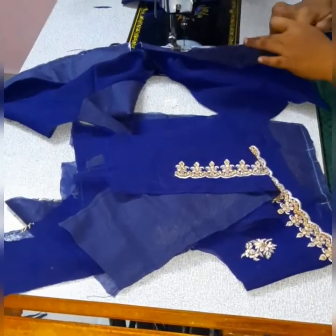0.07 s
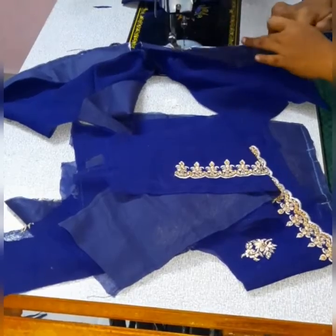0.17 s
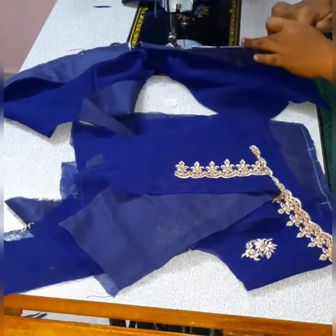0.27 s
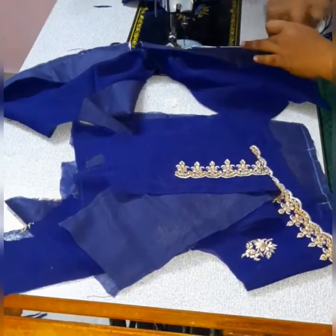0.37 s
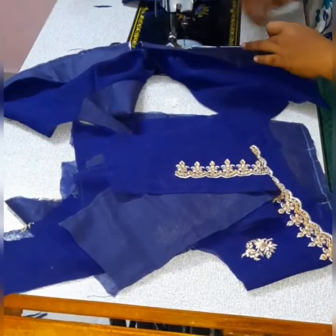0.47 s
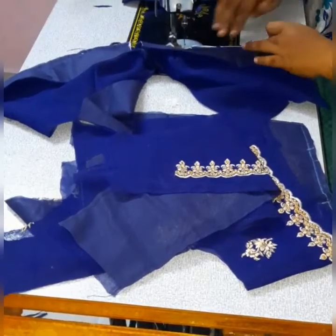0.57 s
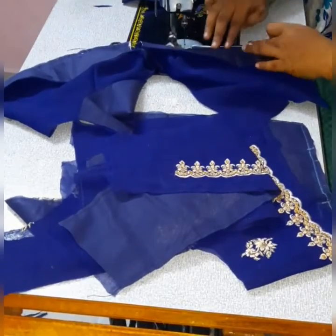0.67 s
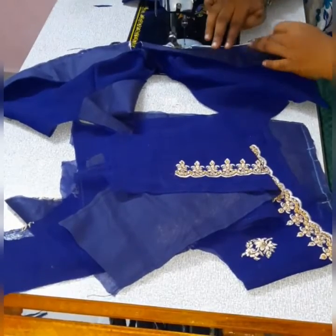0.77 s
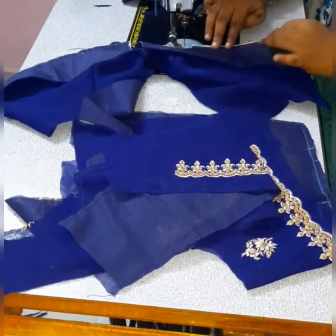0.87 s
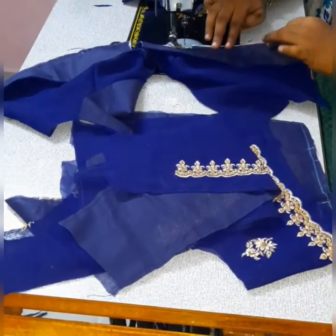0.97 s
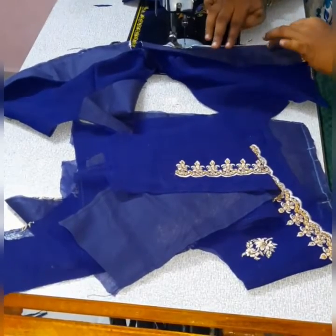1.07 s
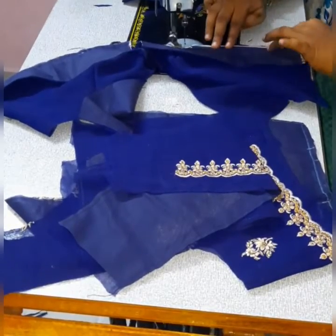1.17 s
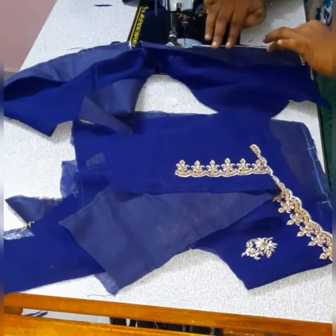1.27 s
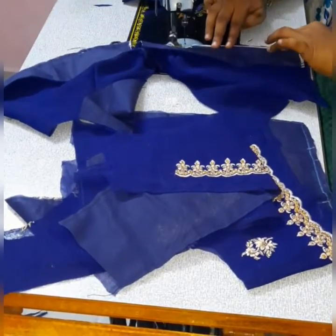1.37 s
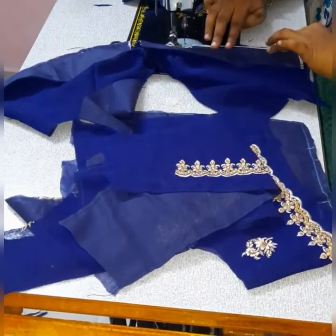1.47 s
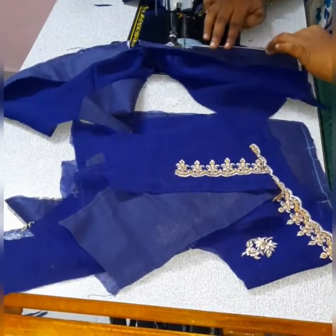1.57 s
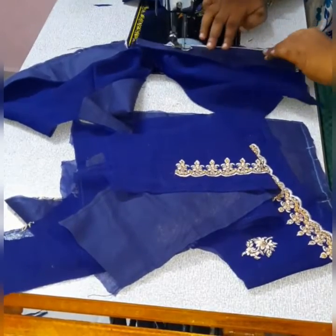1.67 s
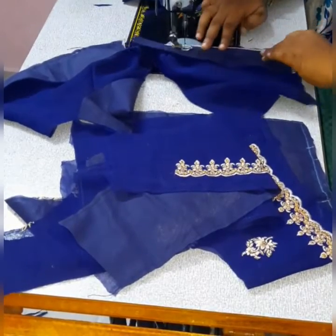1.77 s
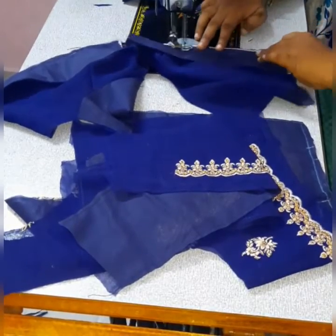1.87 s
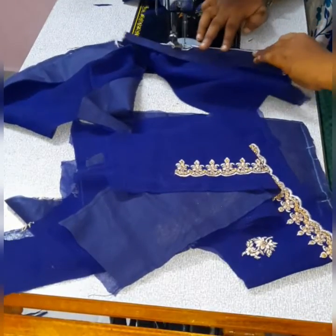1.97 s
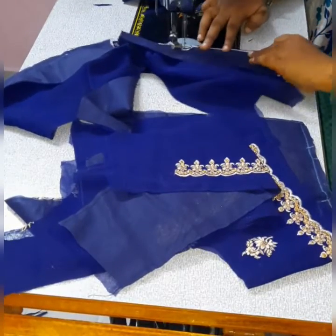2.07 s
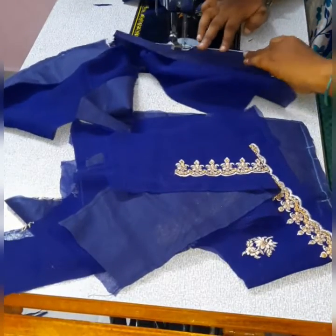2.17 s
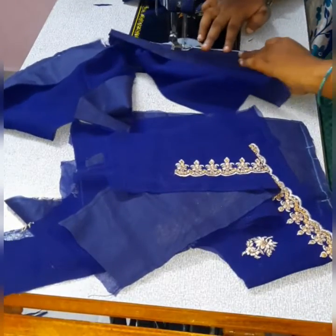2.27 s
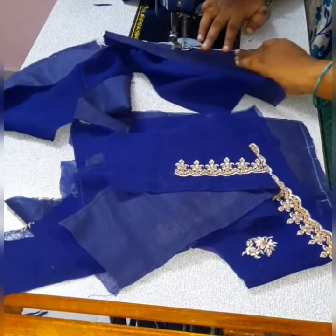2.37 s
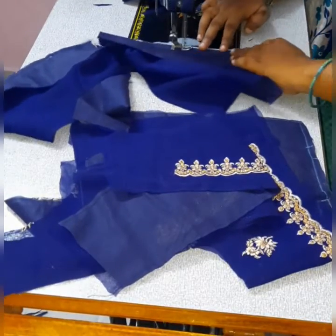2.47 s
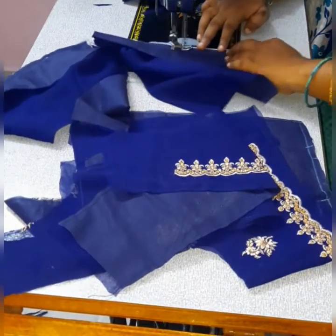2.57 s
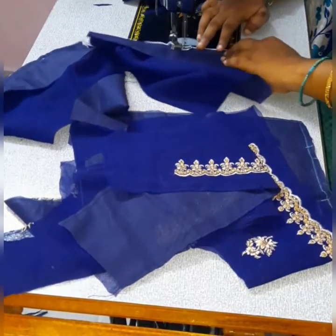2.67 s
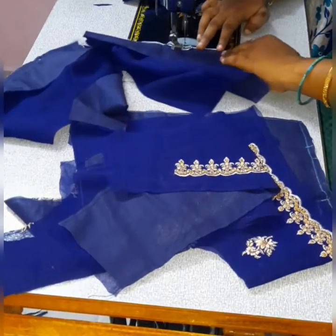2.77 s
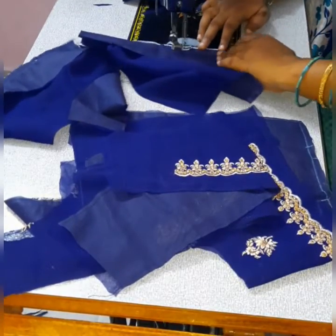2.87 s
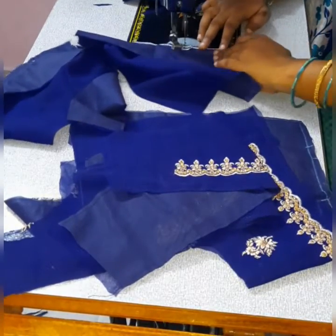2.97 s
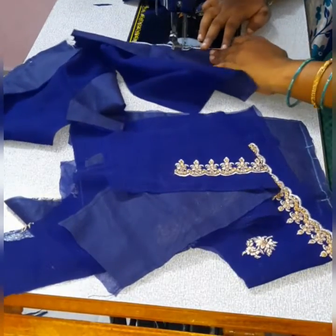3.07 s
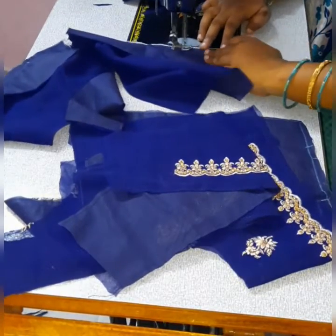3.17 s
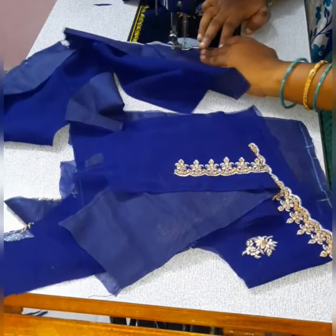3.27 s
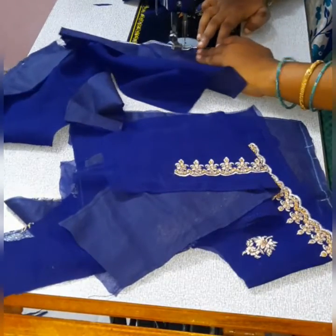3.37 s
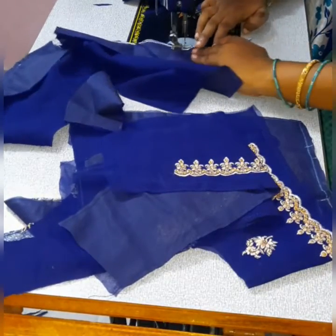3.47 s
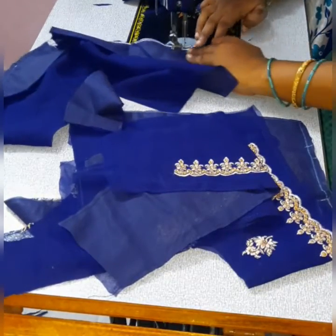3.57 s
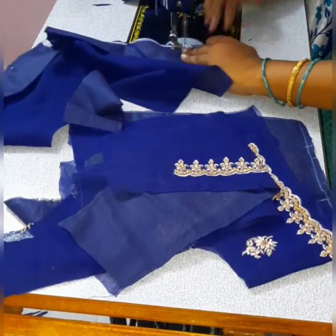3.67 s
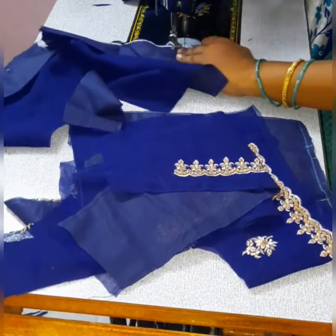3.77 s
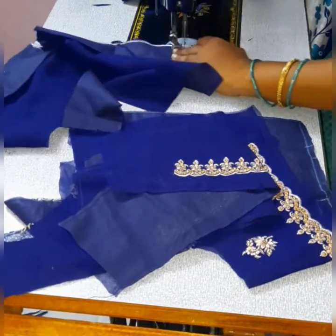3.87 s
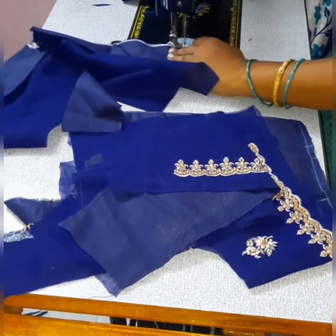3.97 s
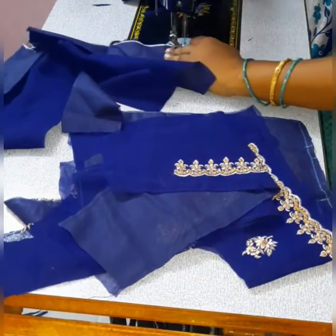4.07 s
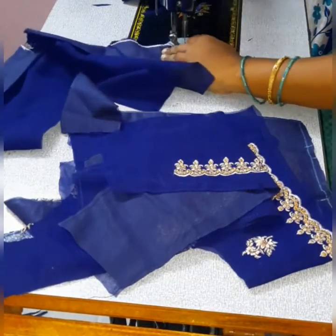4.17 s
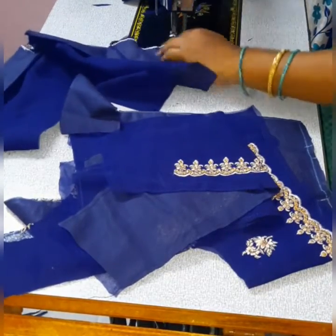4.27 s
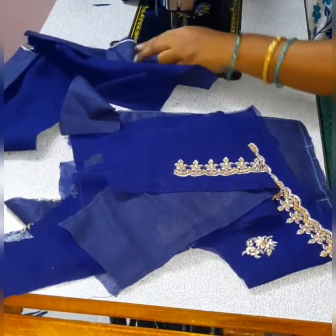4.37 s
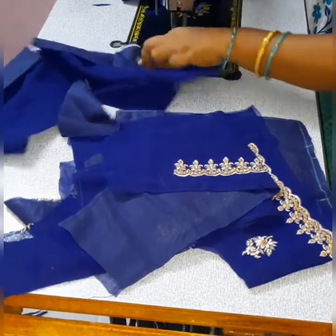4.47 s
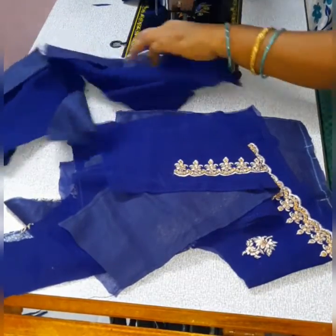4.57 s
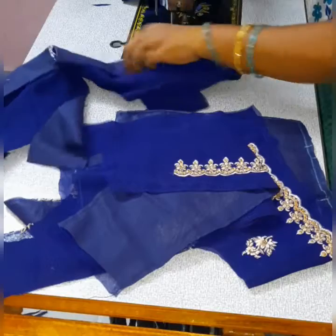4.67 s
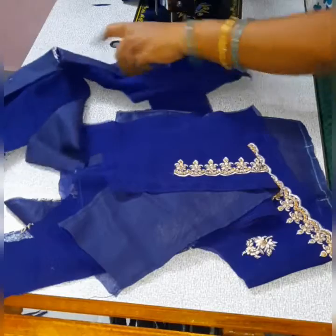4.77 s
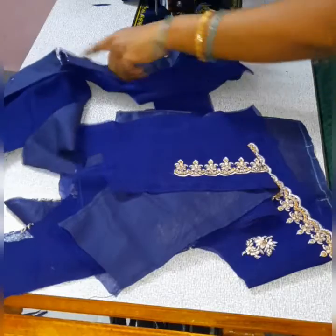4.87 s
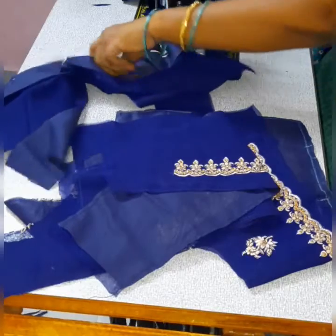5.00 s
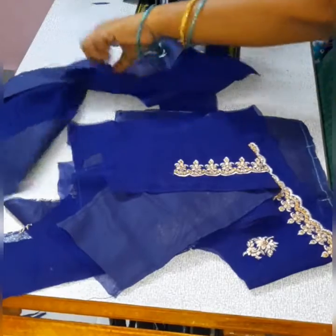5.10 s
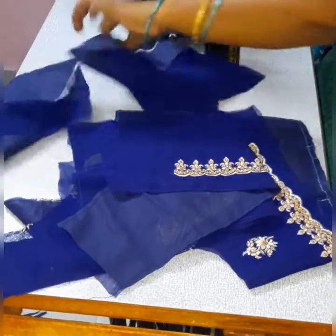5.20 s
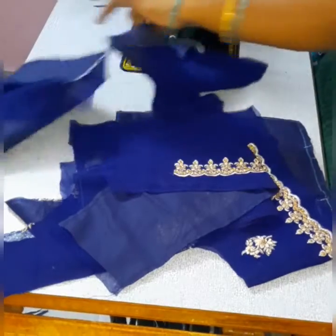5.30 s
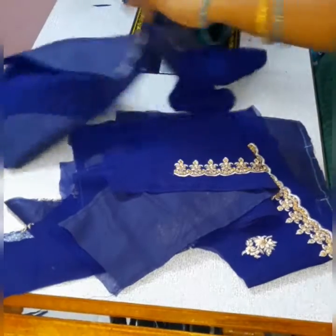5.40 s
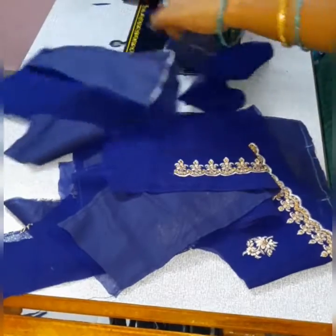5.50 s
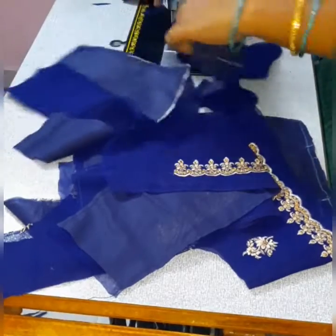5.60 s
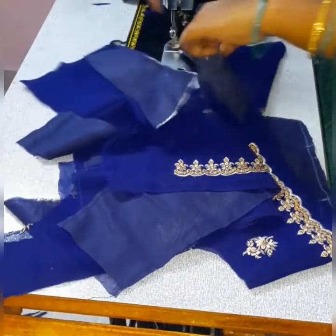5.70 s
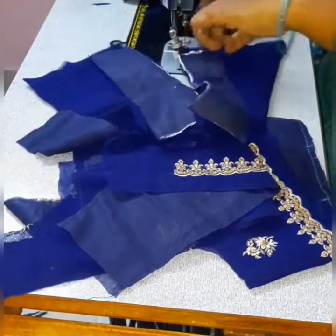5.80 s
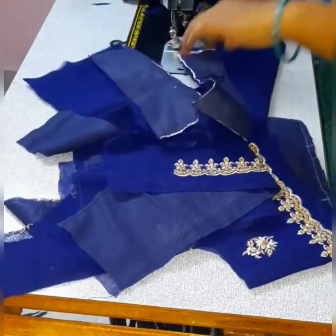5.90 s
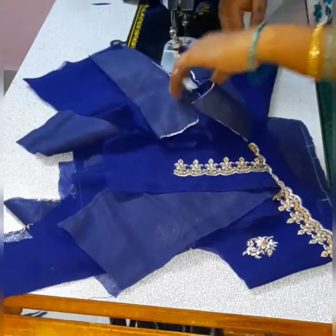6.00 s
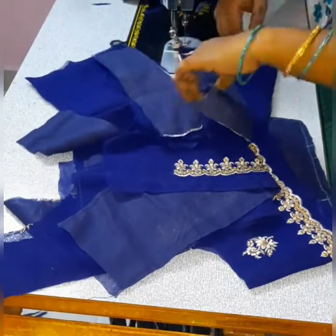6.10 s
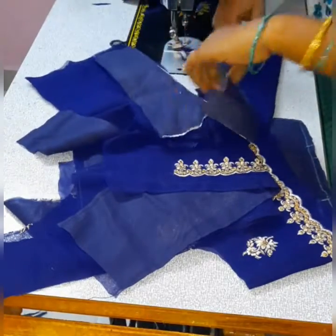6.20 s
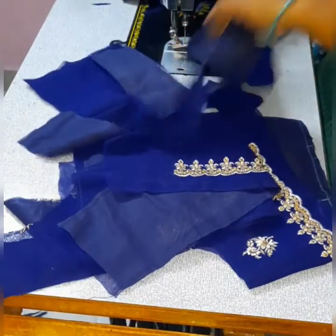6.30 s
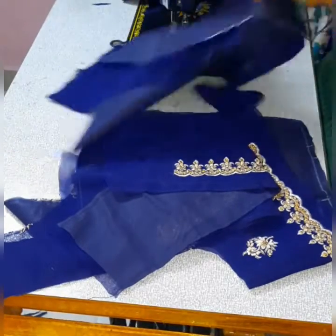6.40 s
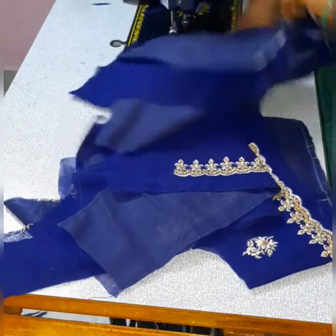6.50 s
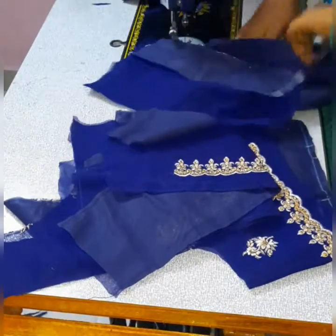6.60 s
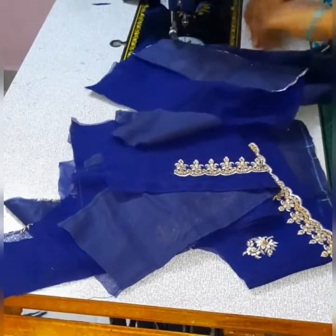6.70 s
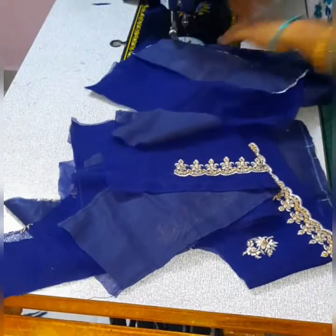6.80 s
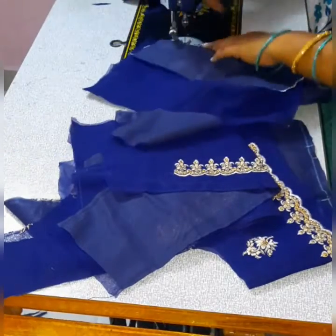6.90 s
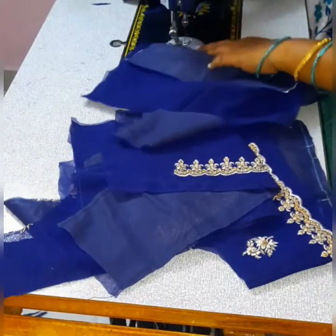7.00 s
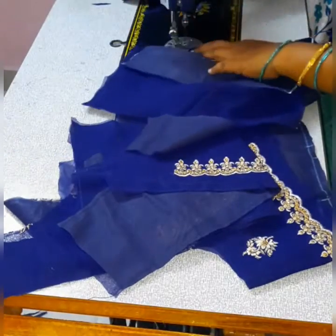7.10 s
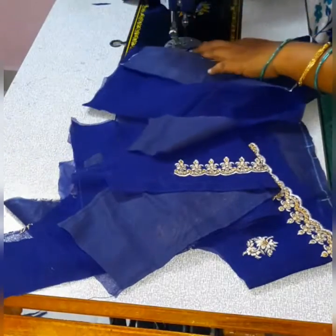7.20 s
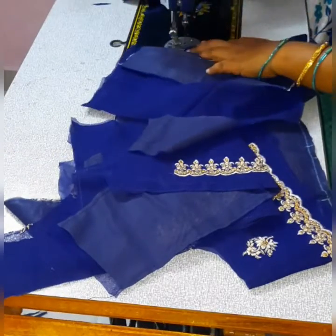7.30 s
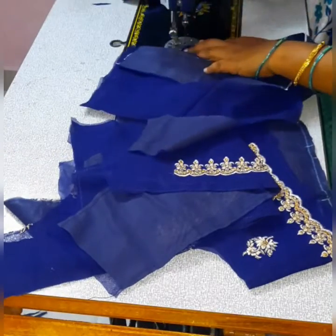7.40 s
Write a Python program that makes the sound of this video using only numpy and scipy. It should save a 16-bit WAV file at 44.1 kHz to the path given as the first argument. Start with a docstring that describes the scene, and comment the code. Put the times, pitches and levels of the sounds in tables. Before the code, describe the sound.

A small, bare-walled room with soft air, faint hiss and low hum, heard close to a cast-iron sewing machine on a wooden table. A light bump and bangle tick come at 0.6 seconds, then the presser foot clanks down in quick metal contacts around 0.8. Cloth slides faintly from 1.0. At 1.5 dry clicks start the seam: rapid clatter of iron, rattling steel and wooden thumping, about twelve to twenty stitches a second, dipping near 1.8 and 3.2, with heavier knocks near 1.6, 2.5 and 3.7 and short rising belt whirrs. From 4.0 it slows, falling to single clacks and stopping by 4.8. Bangles jingle faintly around 5.0; a lever knocks at 5.3 and snaps with a loud bright crack at 5.6, ringing briefly. Soft bumps, short cloth rasps and bangle ticks follow until 6.6, then near-quiet with thin distant chirps and a tiny click at 7.1.

```python
"""Cast-iron sewing machine, one seam

A cast-iron sewing machine on a wooden table sews one seam in a small, hard-walled room, speeding up and down.
Blows timed by the shaft angle excite table modes, iron modes and the chattering spectrum of the steel shuttle.
The presser foot clanks down before the seam and its lever snaps up after it: cracks, clacks and short rings.
Shaped noise makes the pulled cloth, ticking bangles and belt whirr, over soft air, hiss, hum and faint tones.
"""
import sys
import numpy as np
from scipy import signal
from scipy.fft import rfft, irfft
from scipy.io import wavfile
from scipy.ndimage import uniform_filter1d

SR = 44100
rng = np.random.default_rng(int(sys.argv[2]) if len(sys.argv) > 2 else 0)


def to_wav(s):
    """Save 16-bit WAV."""
    ch = np.atleast_2d(s).T  # columns
    pcm = np.round(np.clip(ch, -1, 1) * 32767)  # PCM
    wavfile.write(sys.argv[1], SR, pcm.astype(np.int16))


N = 328545
TIME = np.arange(N) / SR
RING = TIME[:SR // 2]  # time axis of every ring and echo tail


# Shaft speed, one stitch a turn: (time [s], speed [Hz])
SHAFT_SPEED = [(1.47, 7.7), (1.53, 12.4), (1.6, 16.15), (1.83, 12.2), (2.0, 17.63), (2.55, 19.74),
               (2.9, 15.64), (3.21, 13.3), (3.27, 16), (3.45, 18.36), (3.7, 21.15), (4.0, 14),
               (4.16, 12.56), (4.27, 13.36), (4.54, 8.95), (4.64, 4.7), (4.77, 2.3)]


def shaft():
    """Turns of the main shaft since the seam began: its speed summed over time."""
    sewing = (TIME > SHAFT_SPEED[0][0]) * (TIME < SHAFT_SPEED[-1][0])
    return np.cumsum(curve(SHAFT_SPEED) * sewing) / SR


# Blows within one stitch, relative levels:
# (shaft angle [turns], level into table [dB], level into iron [dB], level into steel [dB])
STITCH_BLOWS = [(.15, 1, -7, -0.5), (.28, 3, -6, -2.5), (0.431, -2.5, -15, -7.5), (.52, -7, -5, -11),
                (.66, 1.5, -4, -2.5), (0.771, 0.5, -9.5, -4), (.95, -17, 2.5, -5.5)]


def linkage(turns, scatter_db=2.5, play_s=.0006):
    """The linkage strikes at fixed shaft angles, scattered in level, and in time by slack in the joints."""
    steel_force = np.zeros(N)
    clacks = []
    for angle, table_db, iron_db, steel_db in STITCH_BLOWS:
        times = TIME[np.searchsorted(turns, np.arange(angle, turns[-1], 1))]
        chance = rng.standard_normal((len(times), 4)).T
        times = times + play_s * chance[0]
        clacks.append([times, table_db + scatter_db * chance[1], iron_db + scatter_db * chance[2]])
        steel_force += taps(times, undb(steel_db + scatter_db * chance[3] / 2))
    times, thump_db, clack_db = np.hstack(clacks)
    return times, thump_db, clack_db, steel_force


# Modes of the wooden table: (frequency [Hz], relative level [dB])
TABLE_MODES = [(50, -19), (85, -11), (104, -10), (136, 2.5), (158, -10.5), (200, -18.5), (278, 4.5),
               (331, 8.5), (362, 3.5), (400, 0.5), (478, 0.5)]
# Modes of the iron head: (frequency [Hz], relative level [dB])
IRON_MODES = [(530, 4.5), (597, 10), (695, -2.5), (758, 0), (900, -1), (1037, 5.5), (1222, 3), (1390, 2),
              (1570, 3.5), (1900, 2), (2224, -11)]
# Dense ring of the small steel parts, as a spectrum: (frequency [Hz], relative level [dB])
STEEL_SPECTRUM = [(600, -5.5), (1500, -16.5), (2500, -1.5), (3500, -5.5), (5000, -3.5), (7000, -4.5),
                  (8500, -3.5), (10000, -9), (11000, -10), (11900, -6.5), (15500, -10.5)]
# Clear modes of the shuttle and needle plate: (frequency [Hz], relative level [dB])
SHUTTLE_MODES = [(2115, -5), (2224, -2), (3690, -3), (4455, -3.5)]
# Direct sound of table, iron and steel against their echoes: one level [dB] each
PARTS_DIRECT = [-0.5, -12, -18]
SOFT_BELOW_HZ = 12


def machine(table_t60_s=0.15, iron_t60_s=0.023, shuttle_t60_s=0.069, spot_db=3,
            rub_db=-8, slide_db=-6, crack_db=-4, shuttle_db=-10):
    """Blows ring table, iron and steel; slow iron and steel meet softly, so the rubbing stands out."""
    turns = shaft()
    times, thump_db, clack_db, steel_force = linkage(turns)
    # the shuttle swings out and back, so rubbing swells twice a turn
    swing = (np.gradient(turns) > 0) * np.abs(np.cos(2 * np.pi * (turns - STITCH_BLOWS[0][0])))
    hardness = np.minimum(curve(SHAFT_SPEED) / SOFT_BELOW_HZ, 1) ** 2

    table = strike(times, thump_db, TABLE_MODES, table_t60_s, spot_db=3.0)

    # loose parts buzz for a moment after each blow
    crack = through(taps(times, undb(clack_db)), fade(0.032)) * grit(5.1)
    chatter = through(steel_force, fade(0.032)) * grit(5.1)
    crack = signal.sosfilt(signal.butter(2, [1500, 4500], "band", fs=SR, output="sos"), crack)

    rub = through(grit(4), ring(IRON_MODES, iron_t60_s))
    iron_blows = steady(strike(times, clack_db, IRON_MODES, iron_t60_s, spot_db))
    iron = hardness * iron_blows + undb(rub_db) * swing * rub

    steel_body = colour(STEEL_SPECTRUM)
    steel_body = steel_body + undb(shuttle_db) * ring(SHUTTLE_MODES, shuttle_t60_s)[:len(steel_body)]
    rattle = hardness * steady(chatter) + undb(slide_db) * swing * grit(2.7)
    steel = through(rattle, steel_body) + undb(crack_db) * hardness * steady(crack)

    return sum(steady(room(part, PARTS_DIRECT[k])) * undb(effort(axis=k))
               for k, part in enumerate([table, iron, steel]))


REFERENCE_SPEED_HZ = 20
# Growth with speed, one row each for table, iron, steel:
# (level at reference speed [dB], slope [dB per doubling of speed])
LOUDNESS_BY_SPEED = [(-24, 12), (-24, 15.5), (-29.5, 12)]
# Thick layers under the needle load the machine:
# (time [s], half-length [s], table change [dB], iron change [dB], steel change [dB])
THICK_LAYERS = [(1.669, 0.14, 6, 8, -3.5), (3.767, 0.1, 7.5, -1.5, 0)]


def effort(axis):
    """Level in dB of table, iron or steel: it follows the speed and changes over thick layers."""
    reference_db, db_per_doubling = LOUDNESS_BY_SPEED[axis]
    load_db = sum(part_db[axis] * np.exp(-((TIME - s) / half_s) ** 2) for s, half_s, *part_db in THICK_LAYERS)
    return reference_db + db_per_doubling * doublings() + load_db


def doublings():
    """Shaft speed in doublings above the reference speed, negative below it."""
    return np.log2(np.maximum(curve(SHAFT_SPEED), 1) / REFERENCE_SPEED_HZ)


# Needle punching thick layers, levels before the lifts in knocks():
# (time [s], level into table [dB], level into iron [dB], strongest ring of the head [Hz])
NEEDLE_KNOCKS = [(1.519, -22, -21.5, 1440), (1.578, -16, -15, 1378), (1.6, -6.5, -15.5, 1037),
                 (1.911, -38, -25.5, 1376), (1.987, -14.5, -17.5, 700), (2.542, -7, -9, 1495),
                 (3.231, -24.5, -17, 1199), (3.675, -11.5, -8, 760), (3.698, -9, -10.5, 589),
                 (3.727, -19.5, -5, 1570), (3.747, -8.5, -10, 1564), (3.795, -4, -15, 598),
                 (4.222, -13.5, -19, 1110), (4.325, -44, -18, 1170)]
KNOCK_DIRECT_DB = -7  # the needle is in plain view
FOCUS_OCTAVES, KNOCK_TOP_HZ = 0.19, 4500  # span of the modes one knock brings out; treble limit


def knocks(table_db=20, iron_db=19, focus_db=10, iron_t60_s=0.023):
    """Heavy blows shake table and head together; each brings out its own modes of the head."""
    times, push_db, _, _ = np.transpose(NEEDLE_KNOCKS)
    sound = through(taps(times, undb(push_db + table_db)), ring(TABLE_MODES, 0.089))
    for s, _, blow_db, focus_hz in NEEDLE_KNOCKS:
        modes = []
        for hz, db in IRON_MODES + SHUTTLE_MODES:
            nearness = np.exp(-(np.log2(hz / focus_hz) / FOCUS_OCTAVES) ** 2)
            modes.append((hz, db + focus_db * nearness))
        sound += through(taps([s], [undb(blow_db + iron_db)]), ring(modes, iron_t60_s))
    # the cloth cushions the blow
    return signal.sosfilt(signal.butter(1, KNOCK_TOP_HZ, fs=SR, output="sos"), sound)


# Dry steel clicks, two as the seam starts and one after it:
# (time [s], level [dB], chatter decay to -60 dB [s])
STEEL_CLICKS = [(1.472, -12.5, 0.04), (1.489, -13, .07), (7.131, -30, 0.0036)]


def steel_clicks():
    """Short uneven bursts coloured by the small steel parts."""
    return through(blows(STEEL_CLICKS), colour(STEEL_SPECTRUM))


# Whirr at each push of the treadle: (start [s], length [s], starting pitch [Hz], level [dB])
TREADLE_PUSHES = [(1.868, 0.12, 668.6, -27.5), (2.13, 0.099, 775, -23), (2.37, 0.14, 777, -29),
                  (3.25, 0.12, 728, -27.5), (3.45, 0.15, 784.5, -27.5)]
WHIRR_RISE_HZ_PER_S = 750


def belt(width_hz=65, throb=0.41, fade_s=0.032):
    """A rough belt whirr that rises in pitch through each push and throbs once a turn."""
    whirr, blur = np.zeros(N), wander(width_hz)
    for start, length, hz, db in TREADLE_PUSHES:
        age = TIME - start
        gate = np.clip(np.minimum(age, length + fade_s - age) / fade_s, 0, 1)
        turning = np.exp(2j * np.pi * (hz + WHIRR_RISE_HZ_PER_S * age / 2) * age)
        whirr += undb(db) * gate * np.real(blur * turning)
    return np.sqrt(2) * whirr * (1 + throb * np.cos(2 * np.pi * shaft()))


# Table droning on as the machine coasts to rest: (start [s], end [s], level [dB])
TABLE_DRONES = [(4.49, 4.59, -37.5), (4.63, 4.72, -46.5), (4.76, 4.9, -58.5)]


def table_drone():
    """A blurred low tone: narrow noise around one pitch."""
    return thin_tone(TABLE_DRONES, 335, 27, clean=0, fade_s=.025)


# Bright crack of steel on steel, as a spectrum: (frequency [Hz], relative level [dB])
CRACK_SPECTRUM = [(300, -6), (1000, -9), (3900, -1), (4550, 3), (5500, -6.5), (8600, -2.5), (10200, -12),
                  (12000, -5.5)]


def metal(hits, modes, body, t60_s, ring_db, clack_db):
    """Steel meeting steel: a bright crack, a broad clack damped by the contact, then a short free ring."""
    clack = through(blows([(s, db, chatter_s) for s, db, _, chatter_s in hits]), colour(body))
    free = sum(through(taps([s], [undb(db)]), ring(modes, t60_s, spot_db=2)) for s, db, _, _ in hits)
    crack = through(blows([(s, db, chatter_s) for s, _, db, chatter_s in hits]), colour(CRACK_SPECTRUM))
    return undb(ring_db) * free + undb(clack_db) * clack + crack


# Presser foot coming down, clank before its lifts:
# (time [s], clank level [dB], crack level [dB], chatter decay to -60 dB [s])
FOOT_BLOWS = [(.770, -40, -32, 0.039), (.799, -41, -44, 0.011), (.822, -42, -42, 0.013),
              (.846, -50, -19, 0.04)]
# Modes of the foot: (frequency [Hz], relative level [dB])
FOOT_MODES = [(156, 1.5), (307, 4), (1028, 7), (1500, -1), (1588, 5)]
# Its dull clack on the cloth and plate, as a spectrum: (frequency [Hz], relative level [dB])
FOOT_CLACK_SPECTRUM = [(90, -20), (160, -20), (310, 0.5), (750, -15), (1030, -15), (1550, -2.5),
                       (1840, -20), (2350, -7), (3100, -27), (4300, -20), (5400, -37)]


def presser_foot():
    """The foot meets cloth and plate in a few quick metal contacts."""
    return metal(FOOT_BLOWS, FOOT_MODES, FOOT_CLACK_SPECTRUM, t60_s=.06, ring_db=29, clack_db=31.0)


# The foot's lever creaks, knocks and snaps up, clank before its lifts:
# (time [s], clank level [dB], crack level [dB], chatter decay to -60 dB [s])
LEVER_BLOWS = [(5.285, -55.5, -31, .01), (5.329, -44, -16, 0.035), (5.613, -29.5, -1, 0.039),
               (5.640, -37, -12.5, 0.035)]
# Modes of the lever: (frequency [Hz], relative level [dB])
LEVER_MODES = [(350, 2), (1034, 2), (1270, 0), (1870, 1), (3359, -4)]
# Its loose clack in the head, as a spectrum: (frequency [Hz], relative level [dB])
LEVER_CLACK_SPECTRUM = [(100, -22), (220, -15), (345, 1), (500, -11.5), (1100, -1), (1650, -10),
                        (1880, -6.5), (2300, -12.5), (4600, -9), (15500, -20)]


def foot_lever():
    """The lever's metal contacts, with its spring singing after them."""
    return metal(LEVER_BLOWS, LEVER_MODES, LEVER_CLACK_SPECTRUM, t60_s=.07, ring_db=25.0, clack_db=29.5) + spring()


def spring(hz=11520, t60_s=.35, below_crack_db=-17.5):
    """The lever's spring sings thinly after each blow: one high decaying mode."""
    times, _, crack_db, _ = np.transpose(LEVER_BLOWS)
    return through(taps(times, undb(crack_db + below_crack_db)), ring([(hz, 0)], t60_s))


# Hands and treadle bumping the table, before the lift in bumps(): (time [s], level [dB])
TABLE_BUMPS = [(0.576, -47.5), (5.179, -43.5), (5.334, -38.5), (5.47, -42), (5.86, -44.5)]


def bumps(bump_db=37):
    """Soft bumps, low-passed pushes, move the table alone."""
    times, db = np.transpose(TABLE_BUMPS)
    soft = signal.sosfilt(signal.butter(2, 150, fs=SR, output="sos"), taps(times, undb(db)))
    return undb(bump_db) * through(soft, ring(TABLE_MODES, 0.097))


# Pulls of cloth over the table: (start [s], length [s], level [dB])
CLOTH_SLIDES = [(1.047, 0.37, -70.5), (5.163, 0.31, -65), (5.433, 0.13, -62.5), (5.78, 0.12, -59.5),
                (5.896, 0.058, -53.5), (6.396, 0.042, -48.5), (6.519, 1, -79)]
# Rasp of the cloth, as a spectrum: (frequency [Hz], relative level [dB])
CLOTH_SPECTRUM = [(410, -34), (700, -4), (1410, -3.5), (2220, -5.5), (4600, -7.5), (8300, -12.5),
                  (15500, -21)]
# Light ticks of bangles and steel: (time [s], tick level [dB], jingle level [dB])
BANGLE_TICKS = [(0.569, -29.5, -42), (0.847, -34, -40), (4.92, -36, -34), (5.026, -28, -25.5),
                (5.913, -19.5, -33), (5.979, -24, -32), (6.036, -26, -29), (6.527, -30, -21.5),
                (6.595, -34, -46), (6.973, -35, -43)]
# Ring of the bangles, as a spectrum: (frequency [Hz], relative level [dB])
BANGLE_SPECTRUM = [(1500, -9), (4000, -10), (7000, 0), (10200, -1), (11800, 8), (14500, -6)]


def handling(jingle_s=0.15, rustle_db=-81, rough_db=5, catch_db=3, catch_hz=18):
    """Threads rasp over the table at each pull, catching and slipping; bangles tick and jingle briefly."""
    motion = sum(undb(db) * stroke(start, length) for start, length, db in CLOTH_SLIDES) + undb(rustle_db)
    catching = undb(catch_db * np.real(wander(catch_hz)))
    cloth = motion * catching * through(grit(rough_db), colour(CLOTH_SPECTRUM))
    times, tick_db, _ = np.transpose(BANGLE_TICKS)
    jingle = catching * blows([(s, db, jingle_s) for s, _, db in BANGLE_TICKS])
    return cloth + through(taps(times, undb(tick_db)) + jingle, colour(BANGLE_SPECTRUM))


def stroke(start, length, attack_s=0.028, release_s=0.021):
    """One pull on the cloth: it gathers speed, holds and dies away."""
    attack = np.clip((TIME - start) / attack_s, 0, 1) ** 2
    return attack * np.exp(-np.maximum(TIME - start - length, 0) / release_s)


# Air of the still room, as a spectrum: (frequency [Hz], relative level [dB])
AIR_SPECTRUM = [(20, -25), (48, -14.5), (96, -1), (150, 6.5), (200, -9.5), (325, 7), (500, -4.5),
                (1000, -13.5), (2500, -35), (15500, -53.5)]
# Level of the room noise: (time [s], level [dB])
AIR_LEVEL = [(0, -55.5), (1.3, -58.5), (4.9, -62), (7.45, -66.5)]
# Low hum: (frequency [Hz], level [dB])
HUM_TONES = [(48.4, -70), (96.5, -68.5)]
# A faint thin whine: (start [s], end [s], level [dB])
WHINE_SPANS = [(4.72, 5.27, -72.5), (7.2, 7.6, -71)]
# Far-off chirps: (start [s], end [s], level [dB])
CHIRP_SPANS = [(6.59, 6.68, -73), (6.76, 6.84, -76), (6.885, 6.975, -72), (7.03, 7.115, -68),
               (7.29, 7.41, -70)]
# Steady faint hiss, as a spectrum: (frequency [Hz], relative level [dB])
HISS_SPECTRUM = [(1000, -8.5), (2000, 2.5), (3800, -4), (4700, 3.5), (5300, -5.5), (9200, -2.5),
                 (10000, -9.5)]


def background(hiss_db=-75.5):
    """Soft room noise and hiss, a slowly swelling hum and a few thin far-off tones."""
    air = spread(*(through(rng.standard_normal(N), colour(AIR_SPECTRUM)) for _ in range(2)))
    air = air * undb(curve(AIR_LEVEL))
    hum = sum(undb(db) * np.sqrt(2) * np.real(wander(4.4) * np.exp(2j * np.pi * hz * TIME))
              for hz, db in HUM_TONES)
    whine = thin_tone(WHINE_SPANS, 3703, 55, clean=.1, fade_s=.1)
    chirps = sum(thin_tone(CHIRP_SPANS, hz, 75, clean=0, fade_s=.025) for hz in (850, 1700))
    hiss = np.array([through(rng.standard_normal(N), colour(HISS_SPECTRUM)) for _ in range(2)])
    return air + undb(hiss_db) * hiss + hum + room(whine + chirps, direct_db=-5)


def thin_tone(spans, hz, width_hz, clean, fade_s):
    """A tone that fades in and out; "clean" is its share of steady power, the rest is blurred."""
    gate = sum(undb(db) * np.clip(np.minimum(TIME - start, end - TIME) / fade_s, 0, 1)
               for start, end, db in spans)
    swell = np.sqrt(clean) + np.sqrt(1 - clean) * wander(width_hz)
    return gate * np.sqrt(2) * np.real(swell * np.exp(2j * np.pi * hz * TIME))


def wander(width_hz):
    """Slow complex noise of unit power."""
    slow = signal.sosfilt(signal.butter(2, width_hz, fs=SR, output="sos"), rng.standard_normal((2, N)))
    return (slow[0] + 1j * slow[1]) / slow.std() / np.sqrt(2)


def room(x, direct_db=-13.5):
    """Direct sound and strong reflections from bare walls."""
    response = spread(echoes(), echoes())
    response[:, 0] += undb(direct_db)
    return np.array([through(x, unit(side)) for side in response])


def echoes(size=12, bass_t60_s=0.54, mid_t60_s=0.34, top_t60_s=0.27):
    """Dense reflections with an even spectrum; the bass lingers, the top dies first."""
    noise = rng.standard_normal(len(RING))
    bass = signal.sosfiltfilt(signal.butter(2, 500, fs=SR, output="sos"), noise)
    top = signal.sosfiltfilt(signal.butter(2, 6000, "high", fs=SR, output="sos"), noise)
    mid = noise - bass - top
    tail = rfft(bass * fade(bass_t60_s) + mid * fade(mid_t60_s) + top * fade(top_t60_s))
    power = uniform_filter1d(uniform_filter1d(np.abs(tail) ** 2, size), size)
    even = irfft(tail / np.sqrt(power), len(RING))
    return unit(even * np.minimum(1, 2 - 2 * RING / RING[-1]) ** 2)  # closes to silence


def spread(mid, side, wide_hz=570):
    """Diffuse stereo: left and right share the bass, but not the treble."""
    hz = np.fft.rfftfreq(len(mid), 1 / SR)
    apart = hz ** 2 / (hz ** 2 + wide_hz ** 2) / 2
    shared = irfft(rfft(mid) * np.sqrt(1 - apart), len(mid))
    opposed = irfft(rfft(side) * np.sqrt(apart), len(mid))
    return np.array([shared + opposed, shared - opposed])


def strike(times, db, modes, t60_s, spot_db):
    """A run of blows on one body; each lands a little differently and so has its own mix of modes."""
    spots = rng.standard_normal((len(modes), 2, len(times)))
    return sum(through(taps(times, np.sign(side) * undb(db + mode_db + spot_db * weight)), ring([(hz, 0)], t60_s))
               for (hz, mode_db), (side, weight) in zip(modes, spots))


def ring(modes, t60_s, spot_db=0):
    """Decaying modes at unit energy; the striking spot sets their signs and shifts their levels."""
    spot = rng.standard_normal((len(modes), 2))
    shapes = sum(np.sign(side) * undb(db + spot_db * weight) * np.cos(2 * np.pi * hz * RING)
                 for (hz, db), (side, weight) in zip(modes, spot))
    # little leaves a body below its first mode
    radiation = signal.butter(2, 0.88 * modes[0][0], "high", fs=SR, output="sos")
    return unit(signal.sosfilt(radiation, shapes * fade(t60_s)))


def blows(rows):
    """Contacts at (time [s], level [dB], chatter decay [s]), each a short uneven burst."""
    force = np.zeros(N + len(RING))
    for s, db, chatter_s in rows:
        start = int(s * SR)
        force[start:start + len(RING)] += undb(db) * unit(grit(4.1)[:len(RING)] * fade(chatter_s))
    return force[:N]


def taps(times, gains):
    """Single clean pushes, one sample each."""
    return np.bincount((np.asarray(times) * SR).astype(int), gains, N)[:N]


def grit(spread_db):
    """Dense tiny slips of very uneven size: noise whose level jumps every 20 samples."""
    slips = rng.standard_normal(N) * undb(spread_db * np.repeat(rng.standard_normal(N // 20 + 1), 20)[:N])
    return slips / slips.std()


def steady(x, size=6000):
    """Bring a run of blows to about unit power, leaving each blow its shape."""
    local_power = np.abs(uniform_filter1d(np.atleast_2d(x ** 2).mean(0), size))
    return x / np.sqrt(local_power + np.mean(x ** 2) / 10 ** 2)


def colour(points, size=8192):
    """Causal minimum-phase response with the given (frequency [Hz], level [dB]) spectrum, at unit energy."""
    hz, db = np.transpose(points)
    gain = undb(np.interp(np.log(np.fft.rfftfreq(size, 1 / SR) + 1), np.log(hz), db))
    cepstrum = irfft(np.log(gain))[:size // 2]
    cepstrum[1:] *= 2
    return unit(irfft(np.exp(rfft(cepstrum, size))))


def fade(t60_s):
    """Free decay of a struck thing, falling 60 dB in t60_s."""
    return np.exp(-np.log(1000) * RING / t60_s)


def through(x, response):
    """Play a signal through a response."""
    return signal.fftconvolve(x, response)[:len(x)]


def unit(x):
    """Scale a response to unit energy."""
    return x / np.sqrt(np.sum(x ** 2))


def curve(rows, axis=1):
    """One column of a table, joined by straight lines in time."""
    rows = np.array(rows)
    return np.interp(TIME, rows[:, 0], rows[:, axis])


def undb(db):
    """Decibels to gain."""
    return 10 ** (np.asarray(db) / 20)


def scene(left_db=0.44):
    """Machine and cloth share one kind of room; the machine stands a little to the left."""
    sewing = machine() + table_drone()
    sewing = sewing + room(belt() + bumps() + foot_lever())
    sewing = sewing + room(knocks() + steel_clicks() + presser_foot(), KNOCK_DIRECT_DB)
    return sewing * undb([[left_db], [-left_db]]) + room(handling()) + background()


def record(dry, top_hz=15900):
    """A steep low-pass cuts the extreme treble."""
    return signal.sosfilt(signal.ellip(10, .2, 80, top_hz, fs=SR, output="sos"), dry)


dry = scene()
out = record(dry)
to_wav(out)
```